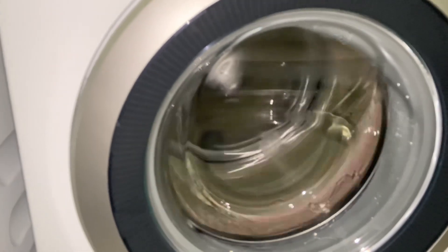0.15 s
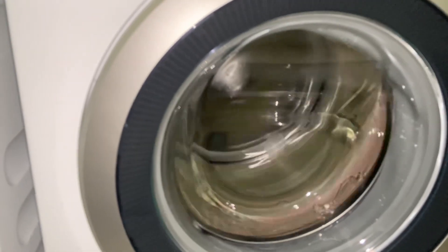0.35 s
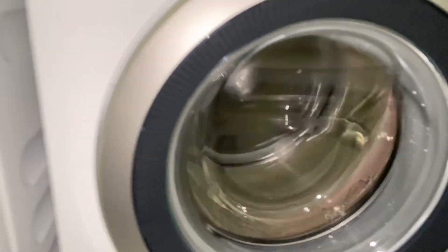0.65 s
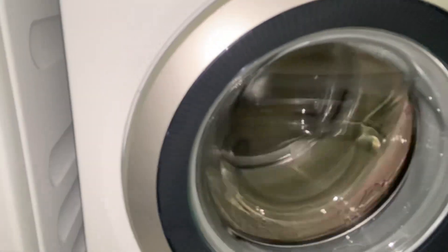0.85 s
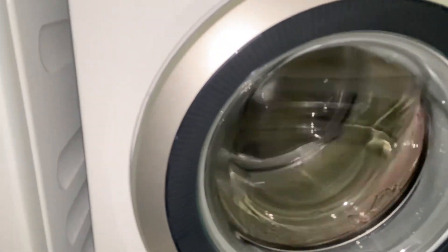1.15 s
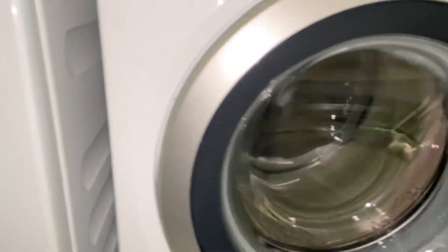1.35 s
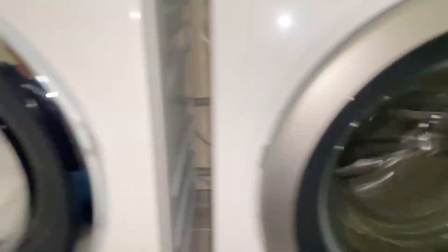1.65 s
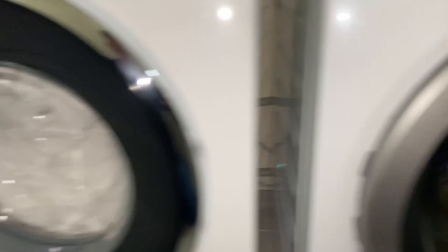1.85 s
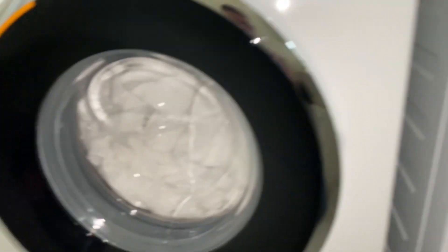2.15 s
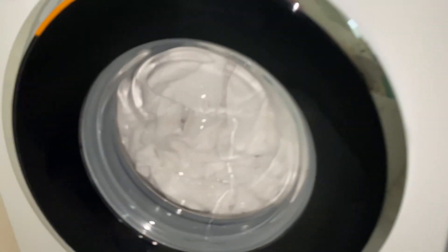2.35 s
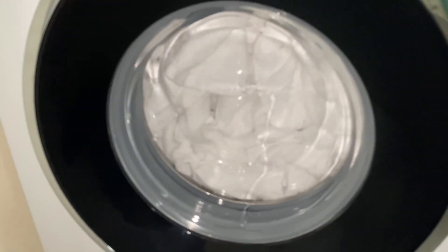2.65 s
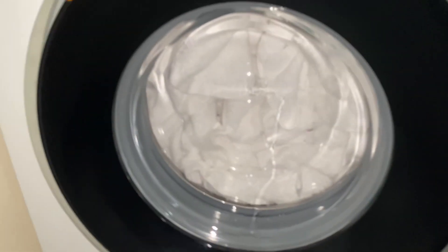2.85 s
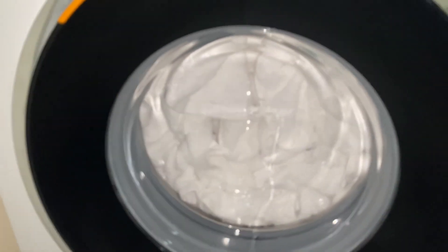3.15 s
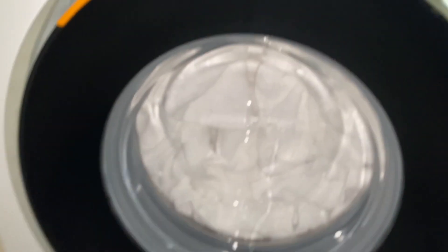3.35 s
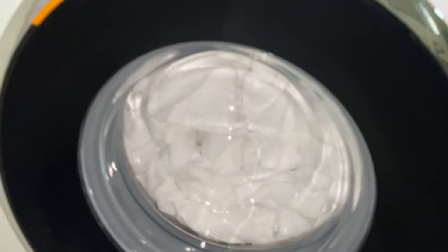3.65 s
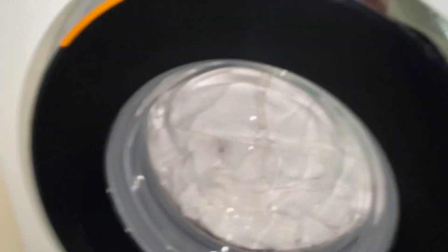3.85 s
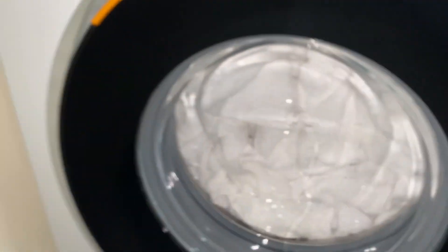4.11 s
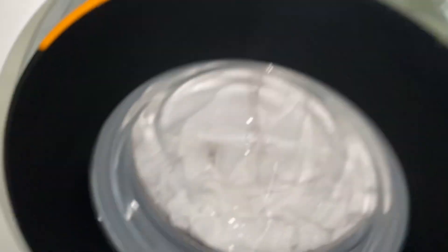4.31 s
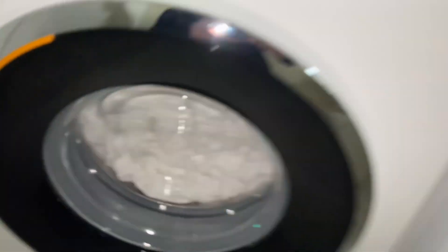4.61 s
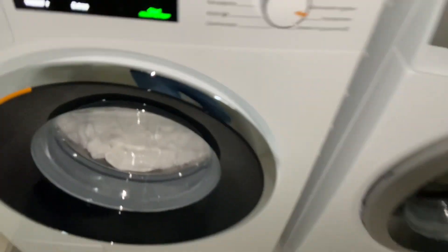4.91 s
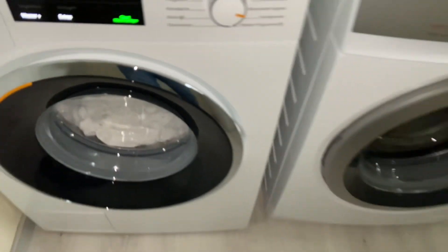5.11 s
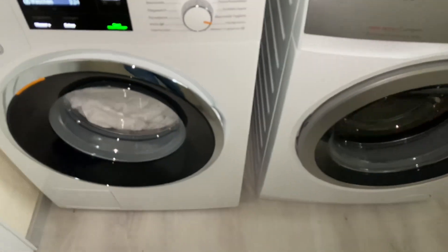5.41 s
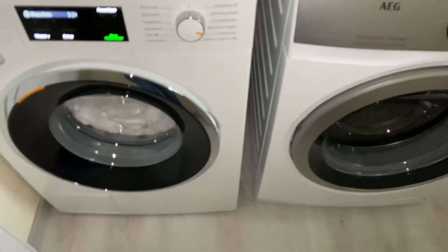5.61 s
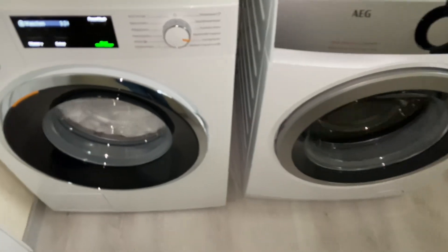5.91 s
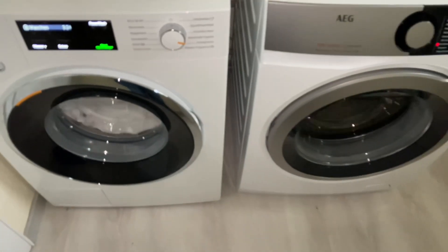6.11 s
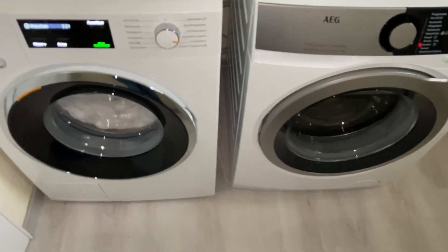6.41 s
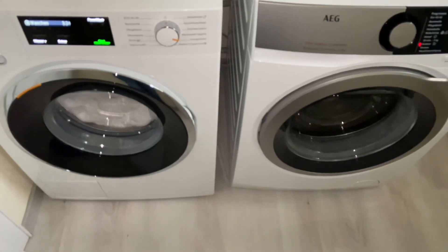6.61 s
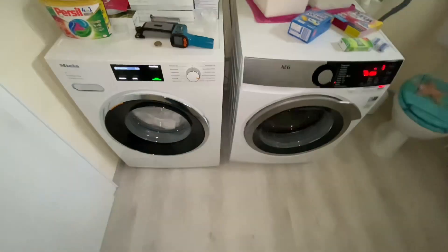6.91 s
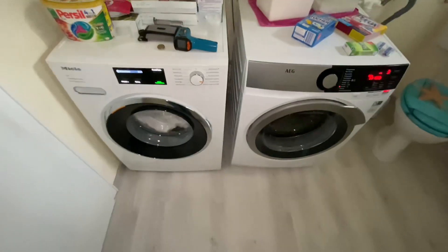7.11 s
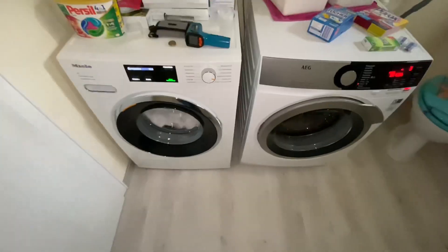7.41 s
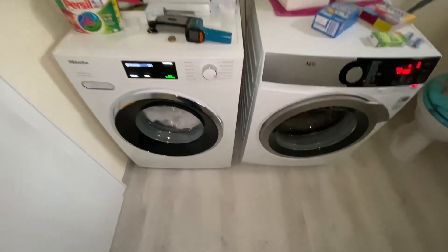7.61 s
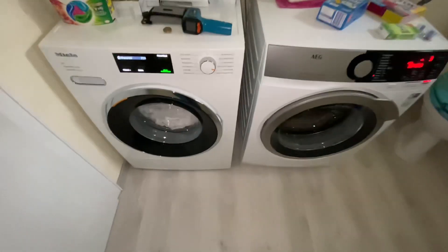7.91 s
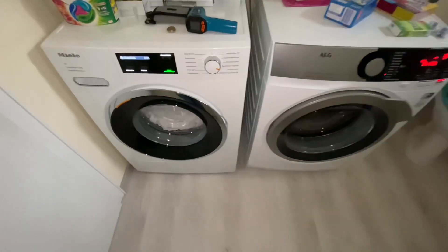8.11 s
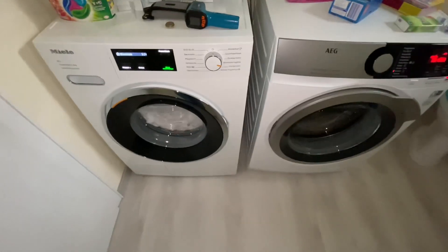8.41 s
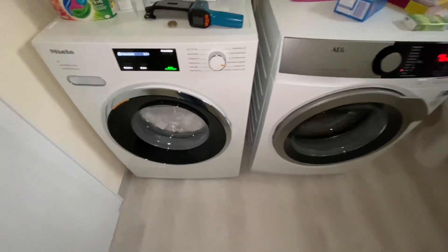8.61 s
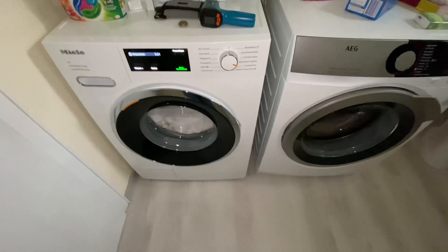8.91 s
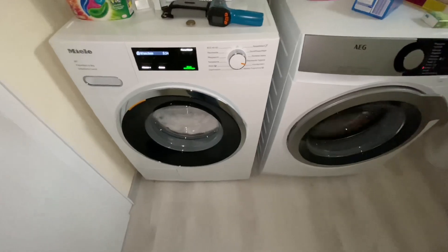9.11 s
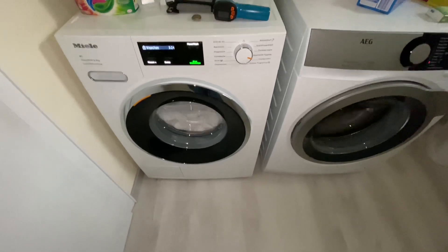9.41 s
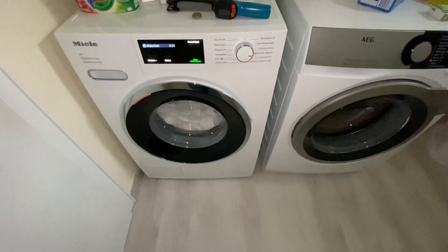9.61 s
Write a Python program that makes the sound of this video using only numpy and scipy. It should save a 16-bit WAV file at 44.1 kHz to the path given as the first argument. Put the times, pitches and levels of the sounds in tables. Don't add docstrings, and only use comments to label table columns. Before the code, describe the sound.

Steady spin-cycle roar with low throbbing hum and wavering thin whine; an early handling knock, later a brighter, airier sound from farther back.

```python
import sys
import numpy as np
from scipy import signal
from scipy.fft import rfft, irfft
from scipy.io import wavfile
from scipy.ndimage import map_coordinates

SR = 44100
rng = np.random.default_rng(int(sys.argv[2]) if len(sys.argv) > 2 else 0)


def store_wav(level_fs):
    pcm = np.round(np.clip(np.atleast_2d(level_fs), -1, 1) * 32767)
    wavfile.write(sys.argv[1], SR, pcm.T.astype(np.int16))


def volts(x):
    e = np.asarray(x, float) / 20
    return 10 ** e


N = 429975

DRUM_HZ, MOTOR_HZ = 20.168, 211.655
# time in seconds, level in dB of the panel singing on the 32nd
PANEL = [(0, -51, -42, -57), (1.4, -55, -53, -45), (1.8, -58, -43.5, -47), (2.2, -59, -41, -50),
         (2.7, -57, -58, -56), (3.4, -44, -65, -53), (4.2, -46, -55, -45), (4.6, -47, -51, -37),
         (5, -45, -57, -40), (5.4, -38, -46, -44), (5.8, -42, -55, -45), (6.4, -50, -42, -52),
         (7, -41.5, -45, -61), (7.8, -38, -42.5, -45), (8.3, -38.5, -38.5, -44), (9, -42, -45.5, -43.5),
         (9.4, -42.5, -55, -39), (9.75, -40, -56, -43)]
# start in seconds, peak in dB, ring in Hz.
KNOCKS = [(0.345, -20.5, 563), (0.793, -24, 600), (2.265, -27, 650), (3.606, -27, 554), (4.17, -23, 736),
          (4.716, -24, 705), (5.111, -25, 743), (6.529, -26, 743), (6.875, -21, 713), (6.998, -19, 642),
          (7.838, -19, 644), (8.332, -17, 650), (8.433, -20, 637), (8.53, -23, 635), (8.628, -19, 640),
          (8.729, -25, 606), (9.129, -21, 651)]


def in_time(rows):
    s, *columns = np.transpose(rows)
    return [np.interp(np.arange(N) / SR, s, c) for c in columns]


def by_place(at_first, at_second, at_back):
    # time in seconds, share at the first door (0-1), share at the second door (0-1).
    place = [
        (0, 1, 0),
        (1.75, 1, 0),
        (2.0, 0, 1),
        (4.4, 0, 1),
        (4.85, 0, 0),
        (9.75, 0, 0),
    ]
    first, second = in_time(place)
    return first * at_first + second * at_second + (1 - first - second) * at_back


def in_gap():
    return np.interp(np.arange(N) / SR, (1.7, 1.95, 2.35, 2.6), [0, 1, 1, 0])


def drift(rate):
    r = np.exp(-200 * np.pi * rate / SR)
    slow = signal.lfilter([1], [1, -2 * r, r * r], rng.standard_normal(N // 100 + 2002))[2000:]
    return np.interp(np.arange(N) / 100, np.arange(len(slow)), slow / slow.std())


def band_pass(x, low_hz, high_hz):
    return signal.sosfilt(signal.butter(2, [low_hz, high_hz], "band", fs=SR, output="sos"), x)


def tone(hz, level_db, across_db, wobble, fade_db, start=None):
    start = rng.random() if start is None else start
    turn = 2 * np.pi * (hz * np.arange(N) / SR + start) + wobble * drift(3.4)
    gap = np.pi + min(hz / 330, 3) * rng.normal() + (.6 + hz / 1500) * drift(.6)
    common = volts(level_db + fade_db * drift(4.2)) * np.sin(turn)
    across = volts(across_db + fade_db * drift(1.7)) * np.sin(turn + gap)
    return np.sqrt(2) * np.array([common + across, common - across])


def partials(table, base_hz, wobble, fade_db):
    far = np.interp(np.arange(N) / SR, (6.6, 7.0), [0, 1])
    gap_db = -4.5 * in_gap()
    out = np.zeros((2, N))
    for multiple, first, second, back, far_back, across in table:
        hz = multiple * base_hz
        level_db = by_place(first, second, back + far * (far_back - back))
        if 400 < hz < 800:
            level_db = level_db + gap_db
        out += tone(hz, level_db, across, wobble * max(1, hz / 600), fade_db)
    return out


def drum():
    # multiple of the drum turn, level in dB at first door,
    # second door, first step back, far back, and in dB across the ports.
    drum_lines = [(1, -69, -68, -65, -64, -86), (2, -52, -49, -54, -53, -66), (4, -58, -59, -54, -61, -66),
                  (6, -49, -43, -42, -42, -49), (7, -44, -52, -49, -50, -52), (8, -48, -57, -44, -46, -55),
                  (9, -44, -43, -50, -56, -52), (11, -51, -45, -62, -51, -52), (12, -46, -58, -49, -52, -53),
                  (13, -51, -52, -54, -54, -59), (14, -63, -48, -60, -56, -65),
                  (15, -48, -38, -53, -47, -48), (16, -52, -53, -52, -50, -58), (17, -45, -42, -49, -45, -53),
             (18, -44, -55, -58, -48, -50), (19, -52, -55, -49, -49, -58), (20, -55, -69, -48, -57, -63),
             (21, -55, -53, -47, -53, -54), (22, -49, -63, -55, -52, -53), (23, -58, -54, -56, -65, -62),
             (24, -70, -70, -54, -67, -61), (25, -70, -57, -55, -60, -62),
                  (26, -55, -51, -69, -68, -57), (27, -46, -55, -49, -45.5, -56), (28, -67, -66, -70, -70, -63),
            (29, -48, -52, -64, -61, -52), (30, -52, -48, -48, -50, -50), (31, -52, -57, -55, -59, -61),
            (33, -59, -68, -52, -65, -59), (34, -54, -54, -51, -51, -55), (35, -51, -58, -49, -51, -49),
            (36, -66, -56, -55, -63, -51), (37, -49, -47, -52, -57, -49), (38, -52, -69, -64, -59, -58),
            (39, -53, -56, -48, -57, -54), (40, -57, -58, -69, -61, -64), (41, -71, -63, -64, -63, -65)]
    return partials(drum_lines, DRUM_HZ, wobble=0.12, fade_db=1.9)


def motor_turn():
    # multiple of the motor turn, level in dB at first door, second door, first step back, far back,
    # and in dB across the ports.
    motor = [(4, -61, -58, -72, -58, -56), (8, -63, -63, -66, -68, -64), (10, -68, -69, -73, -66, -66),
             (16, -75, -71, -73, -73, -66)]
    return partials(motor, MOTOR_HZ, wobble=0.22, fade_db=5.0)


def belt_and_bearings():
    # frequency in Hz, level in dB at first door, second door, first step back, far back,
    # and in dB across the ports.
    lines = [(66.9, -45, -49, -51, -52, -62), (162.7, -55, -63, -48, -53, -58),
             (171.3, -53, -58, -54, -55, -63), (191.6, -49, -49, -54, -51, -58),
             (203.8, -52, -62, -56, -58, -68), (291.3, -52, -53, -54, -49, -56),
             (327.8, -67, -57, -52, -49, -61), (553.6, -46, -56, -51, -54, -55),
             (713.8, -67, -57, -55, -61, -54), (740.5, -59, -57, -52, -56, -59),
             (757.4, -67, -58, -67, -60, -58), (772.0, -69, -54, -53, -56, -59),
             (830.4, -70, -63, -48, -53, -51), (845.0, -64, -52, -57, -61, -54),
             (1648.9, -65, -66, -66, -67, -62), (1878.9, -67, -73, -74, -67, -66)]
    return partials(lines, 1, wobble=0.26, fade_db=3.0)


def turn_pattern(level_db, low_hz, high_hz):
    length = 2048
    sparse = volts(5 * rng.exponential(1, length // 2 + 1).clip(0, 3))
    patterns = irfft(rfft(rng.standard_normal((2, 31, length))) * sparse)
    turn = (DRUM_HZ * np.arange(N) / SR % 1) * length
    slowly = np.linspace(0, 30, N)
    heard = np.array([map_coordinates(p, [slowly, turn], order=1, mode="grid-wrap") for p in patterns])
    heard = band_pass(heard, low_hz, high_hz)
    return volts(level_db) * heard / heard.std()


def boom():
    # time in seconds, level in dB.
    level = [(0, -33), (1.9, -33.5), (2.3, -32.5), (4.68, -31.5), (4.78, -39), (4.95, -38), (5.3, -46),
             (5.8, -59), (6.6, -57), (8.07, -43), (9.75, -39)]
    level_db = in_time(level)[0]
    return tone(3 * DRUM_HZ, level_db, level_db - 14, wobble=.05, fade_db=-1.0)


def pump_throb():
    # level in dB at first door, at second door, standing back.
    levels_db = [
        (-40, -36.5, -52),
        (-40.5, -40, -45.5),
        (-48, -47, -46.5),
        (-41, -39, -52.5),
    ]
    t = np.arange(N) / SR
    slip = 1.452 * (t - 0.16)
    above = .845 * (t - 0.87)
    turns = 99.963 * t + np.array([0 * slip, -slip, -2 * slip, above])
    hum = np.zeros(N)
    for levels, turn in zip(levels_db, turns):
        gain = volts(by_place(*levels) + .6 * drift(1.7))
        hum += gain * np.sin(2 * np.pi * turn + .1 * drift(2.2))
    return np.sqrt(2) * hum * (1 + volts(-14.5) * np.array([[-1], [1]]))


def motor_hum():
    # time in seconds, level in dB.
    hum = [(0, -33.5), (1.4, -32.5), (2.2, -32), (2.6, -37.5), (3.4, -36.5), (3.8, -34.5), (4.6, -36),
           (5.8, -39), (6.3, -43), (8, -40.5), (9.75, -45)]
    tenth_hz, tenth_db = 10 * DRUM_HZ, in_time(PANEL)[2]
    crest_s = .054
    out = tone(MOTOR_HZ, in_time(hum)[0], -41.0, wobble=0.1, fade_db=0.6, start=0)
    start = (MOTOR_HZ - tenth_hz) * crest_s
    return out + tone(tenth_hz, tenth_db, -58, wobble=.08, fade_db=.6, start=start)


def singing_panel():
    panel_db, bearing_db, _ = in_time(PANEL)
    panel_hz = 32 * DRUM_HZ
    above_hz, crest_s = 8.62, .073
    out = tone(panel_hz, panel_db, -45, wobble=.1, fade_db=.6, start=0)
    out += tone(panel_hz + above_hz, bearing_db - 1.5, -52, wobble=.1, fade_db=.6, start=-above_hz * crest_s)
    out += tone(32.497 * DRUM_HZ, bearing_db - 7, -56, wobble=.1, fade_db=1, start=-.34)
    motor_db = panel_db - 10 + by_place(9, 1, -1)
    return out + tone(3 * MOTOR_HZ, motor_db, -55, wobble=.1, fade_db=1.5, start=0)


def crests():
    # middle in seconds, length in seconds, peak in dB.
    swells = [(.28, 1, -54), (0.873, 0.51, -53), (1.25, .25, -52), (1.43, 0.3, -44), (1.72, 0.17, -48.5),
              (1.862, .12, -57), (1.976, 0.11, -49), (2.1, 0.11, -55), (2.25, 0.19, -45.5),
              (2.4, 0.18, -46), (2.56, 0.18, -51), (2.726, 0.22, -49), (2.96, 0.21, -52.5),
              (3.17, 0.24, -61), (3.33, 0.43, -54.5), (3.616, 0.52, -53.5), (3.93, .3, -63),
              (4.21, .26, -58), (4.394, 0.079, -46), (4.474, 0.077, -46.5), (4.603, 0.17, -53.5),
              (4.79, 0.22, -66), (4.97, 0.2, -47.5), (5.085, 0.076, -45), (5.158, .075, -51),
              (5.434, 0.26, -50), (5.75, 0.19, -53.5), (5.95, .3, -63), (6.208, 0.24, -52),
              (6.48, 0.3, -61), (6.93, 0.55, -49.5), (7.267, 0.47, -44), (7.546, 0.15, -42.5),
              (7.725, 0.3, -39), (8.176, 0.3, -49.5), (8.388, 0.15, -49), (8.57, 0.36, -54.5),
              (8.89, .25, -51), (9.062, 0.24, -46.5), (9.3, 0.31, -49.5), (9.5, 0.34, -44.5),
              (9.7, .22, -47.5)]
    t = np.arange(N) / SR
    gain = volts(-64.5) * np.ones(N)
    for middle, length, db in swells:
        gain += volts(db) * np.cos(np.pi * np.clip((t - middle) / length, -.5, .5)).clip(0) ** 0.96
    return 20 * np.log10(gain)


def beads():
    # start in seconds, end in seconds, beads per second, a crest in seconds, depth (0-1).
    runs = [
        (-.2, .85, 20.8, .465, .6),
        (-.2, 1.2, 13.5, .97, .45),
        (3.4, 4.1, 19.5, 3.575, .7),
    ]
    t = np.arange(N) / SR
    swing = 1
    for start, end, rate, crest, depth in runs:
        present = np.interp(t, [start, start + .1, end - .1, end], [0, 1, 1, 0])
        swing = swing + depth * present * np.exp(2j * np.pi * rate * (t - crest))
    return 20 * np.log10(np.abs(swing) + .03)


def whine():
    slots_hz, level_db = 24 * MOTOR_HZ, crests()
    out = tone(slots_hz, level_db + beads(), -51 + 2.4 * drift(3.7), wobble=0.55, fade_db=1.13)
    side_lines = ((-DRUM_HZ, -65), (DRUM_HZ - 5, -64), (2 * DRUM_HZ, -72), (100, -73), (-100, -74))   # Hz, dB
    for offset_hz, side_db in side_lines:
        line_db = side_db + .35 * (level_db + 61.5) + by_place(-2, -1.5, -0.45)
        out += tone(slots_hz + offset_hz, line_db, side_db - 1.5, wobble=1.0, fade_db=3.5)
    return out


def whistles():
    # start in seconds, end in
    # seconds, frequency in Hz, width in Hz, level in dB.
    whistle_rows = [(0, 1, 1650, 14, -55), (1.6, 2.6, 1650, 14, -60), (2.5, 3.2, 2250, 60, -59),
                    (7.8, 9.2, 2520, 30, -61), (1, 1.5, 1810, 20, -59), (4.4, 5.5, 1650, 22, -58),
                    (4.5, 5.2, 1697, 12, -58), (5.2, 6.45, 1813, 8, -56), (6.8, 7.4, 1890, 25, -57),
                    (8, 8.55, 1650, 6, -55), (8.25, 9.05, 1696, 10, -59), (4.4, 5.2, 2250, 60, -57),
                    (7.55, 7.9, 3387, 6, -61), (3.8, 4.4, 3387, 5, -60.5), (6.15, 7.3, 3387, 5, -63),
                    (4.6, 5.4, 2500, 25, -62), (6.2, 7, 2490, 15, -62), (8.62, 9.3, 3387, 5, -62),
                    (4.1, 4.7, 2130, 20, -59), (7, 7.5, 2900, 15, -62), (8.5, 9.7, 2960, 25, -63),
                    (6.05, 7.2, 1650, 6, -59), (9.2, 9.75, 1800, 40, -56), (2.5, 4.7, 745, 20, -47),
                    (4.3, 5.5, 800, 120, -45), (0, 1.7, 550, 14, -47), (1.2, 2, 440, 16, -48),
                    (1.5, 1.9, 705, 16, -44), (4.4, 4.9, 840, 16, -48), (5.4, 6, 295, 25, -43),
                    (8.7, 9.1, 680, 80, -41), (5.9, 6.7, 162, 10, -43), (4.5, 5.1, 440, 12, -44),
                    (6.5, 7.2, 700, 40, -44),
                    (5.08, 5.45, 3387, 5, -60.5), (5.75, 6, 3387, 5, -63), (9.42, 9.75, 3387, 5, -63),
              (6.5, 8, 301, 4, -43), (6.5, 7.1, 363, 5, -45), (6.5, 7.4, 706, 14, -46),
              (8.5, 9, 706, 5, -46), (4, 5.2, 706, 5, -47), (3.6, 4.6, 746, 5, -45), (0, .55, 553, 6, -45),
              (6.5, 7, 464, 5, -48), (6.6, 8, 787, 5, -51), (2, 2.5, 830, 5, -51), (1.9, 3.4, 342, 5, -45),
              (9.3, 9.75, 600, 30, -45), (5.05, 5.6, 291, 12, -47), (2.2, 3.3, 845, 5, -52),
              (8.08, 8.3, 3387, 5, -64), (9.3, 9.6, 700, 30, -46)]
    out = np.zeros((2, N))
    for start, end, hz, width, level_db in whistle_rows:
        span = slice(round(start * SR), round(end * SR))
        peak = signal.iirpeak(hz, hz / width, SR)
        narrow = signal.lfilter(*peak, rng.standard_normal((2, N // 4)))
        narrow = signal.lfilter(*peak, narrow)[:, :span.stop - span.start]
        if width < 7:
            narrow = narrow / (np.abs(signal.hilbert(narrow)) + .3 * narrow.std())
        narrow = narrow[0] + 0.061 * narrow[1] * [[1], [-1]]
        swell = signal.windows.tukey(narrow.shape[1], .3)
        out[:, span] += volts(level_db) * narrow / narrow.std() * swell
    return out


def roar_levels():
    # level in dB at first door, at second door, standing back.
    layers_db = [
        (0.5, -2, -2),
        (-0.5, -1.5, -1.2),
        (3, 1.5, -0.5),
        (0.2, 1.5, 1.5),
        (-0.5, 0, -0.5),
        (-2.5, -1.5, -2.5),
    ]
    puff_db = (-0.5, 0, -2, 1.5, 3, 4.5)
    brighter_db = (-2, 1.25, 1, 0.9, 3.5, 2)
    t = np.arange(N) / SR
    puff = np.interp(t - 3.75, [0, .05, .21, .29], [0, 1, 1, 0])
    brighter = np.interp(t - 6.79, [-.04, .04], [0, 1])
    return [by_place(*row) + puff * a + brighter * b for row, a, b in zip(layers_db, puff_db, brighter_db)]


def roar():
    # frequency in Hz, level in dB per Hz.
    mid_colour = [(30, -13), (50, -11), (75, 4.5), (130, -4), (260, -2), (330, -3), (760, -6), (1000, -13),
                  (1400, -21.5), (2200, -23), (4700, -31.5), (7200, -32.5), (11000, -36.5), (15500, -41.5)]
    side_colour = [(30, -36), (70, -3), (204, -20), (260, -7), (732, -4), (1060, -12), (1700, -17),
                   (2600, -25), (4700, -29.5), (7200, -31.5), (9000, -29), (13000, -41), (15500, -33)]
    levels, out = roar_levels(), np.zeros((2, N))
    edges = 25 * 2 ** np.arange(0, 9.6, 1 / 3)
    white = rng.standard_normal((2, 2, N))
    for k, (low, high) in enumerate(zip(edges, edges[1:])):
        band = band_pass(white[k % 2], low, high)
        hz = np.sqrt(low * high)
        colour = []
        for table in (mid_colour, side_colour):
            table_hz, table_db = np.transpose(table)
            colour.append(np.interp(np.log(hz), np.log(table_hz), table_db))
        layer = levels[np.searchsorted([400, 900, 1600, 4000, 9000], hz)]
        patches = volts(layer + .9 * drift(7) + .6 * drift(.8))
        out += band * volts(np.add(colour, [-15.5, -18.5]))[:, None] * patches
    return np.array([out[0] + out[1], out[0] - out[1]]) * volts([[-.9], [.9]])


def hushed(x):
    t = np.arange(N) / SR
    dips = sum(np.interp(t - s, (-.013, -.006, .003, .012), [0, 1, 1, 0]) for s, db, hz in KNOCKS)
    panels = signal.sosfiltfilt(signal.butter(2, [450, 1100], "band", fs=SR, output="sos"), x)
    return x - .6 * np.clip(dips, 0, 1) * panels


def knocks():
    rise_s, t60_s = .0015, .06
    out, t = np.zeros(N), np.arange(SR // 10) / SR
    for s, db, hz in KNOCKS:
        at = round(s * SR)
        ring = volts(db - 60 * t / t60_s) * np.sin(2 * np.pi * hz * t)
        out[at:at + len(t)] += (1 - np.exp(-t / rise_s)) * ring
    return out * volts([[-.8], [.8]])


def bump():
    # start in seconds, push in dB, push in Hz, direction (+-1), rattle in dB.
    contacts = [(.411, -17, 90, 1, -50), (.4195, -15, 90, -1, -47), (.4265, -18, 55, 1, -43),
                (.4333, -10.5, 220, -1, -34), (.435, -30, 300, -1, -37), (.4435, -18, 120, 1, -38),
                (.449, -11, 230, 1, -39), (.452, -17, 80, -1, -41), (.4585, -25, 90, 1, -42),
                (.4708, -14, 170, -1, -37), (.4785, -12, 190, 1, -36.5), (.487, -14, 90, -1, -45),
                (.4925, -23, 150, 1, -44), (.4965, -11, 140, 1, -44), (.5, -20, 55, -1, -45),
                (.508, -25, 120, 1, -46), (.513, -19, 180, -1, -48), (.521, -20, 220, 1, -50),
                (.5335, -18, 240, 1, -46), (.537, -17, 130, -1, -48), (.546, -19, 150, 1, -48),
                (.551, -19, 250, -1, -50), (3.06, -38, 32, 1, -70), (3.42, -38, 35, -1, -70),
                (4.70, -32, 42, 1, -70)]
    # frequency in Hz, width in Hz, level in dB.
    case = [(1750, 500, -3), (2300, 400, 0), (3000, 350, 3), (4500, 1800, -14), (1100, 700, 0),
            (390, 110, 15)]
    out, shaken, t = np.zeros(N), np.zeros(N), np.arange(SR // 5) / SR
    for s, push_db, push_hz, way, rattle_db in contacts:
        tick_hz = max(3000 + 220 * (rattle_db + 34), 1800)
        at = round(s * SR)
        span = slice(at, at + len(t))
        out[span] += np.sign(way) * volts(push_db + 4 - 17 * t * push_hz) * np.sin(2 * np.pi * push_hz * t)
        shaken[span] += volts(rattle_db - 6 - 4900 * t) + volts(rattle_db - 10 - 420 * t)
        out[span] += volts(rattle_db - 2200 * t) * np.sin(2 * np.pi * tick_hz * t)
    common, across = shaken * rng.standard_normal((2, N)) + 1e-18
    noise = common + volts(1.0) * across * [[1], [-1]]
    out = out * volts([[-1.2], [1.2]])
    for hz, width, level_db in case:
        out += volts(level_db) * signal.lfilter(*signal.iirpeak(hz, hz / width, SR), noise)
    return band_pass(out, 28, 5500)


def scene():
    lines = volts(0.5) * (drum() + motor_turn() + belt_and_bearings())
    lines += turn_pattern(-50, 850, 1300) + turn_pattern(-54, 1600, 2700)
    hums = boom() + pump_throb() + motor_hum() + singing_panel()
    room = hushed(lines + hums + whine() + whistles() + roar()) + knocks()
    lean_left_db = by_place(0.53, 0.1, 0.18)
    return room * volts(lean_left_db * np.array([[1], [-1]])) + bump()


def silence_bands(x, bands):
    hz, s, frames = signal.stft(x, SR, nperseg=2048)
    keep = np.ones(frames.shape)
    slices = np.kron(rng.random((len(hz) // 8 + 1, len(s) // 2 + 1)), np.ones((8, 2)))
    slices = slices[:len(hz), :len(s)]
    for low, high, start, end, share in bands:
        whole = np.repeat(rng.random(len(s)), 2)[:len(s)]
        chance = .4 * whole + .6 * slices
        inside = np.outer((hz >= low) & (hz < high), (s >= start) & (s <= end + .03))
        keep[(chance < share) & inside] = 0
    return signal.istft(frames * keep, SR, nperseg=2048)[1][:N]


def low_pass(x):
    return signal.sosfilt(signal.butter(12, 16740, fs=SR, output="sos"), x)


def record(dry):
    # low edge in Hz, high edge in Hz, start in
    # seconds, end in seconds, share of frames (0-1).
    empty_mid = [(8270, 8600, 0, 6.78, .8), (8600, 9640, 0, 6.78, 1), (11900, 12400, 6.8, 9.75, .3),
                 (12400, 13780, 0, 9.75, 1), (13780, 14300, 0, 9.75, .35), (13780, 15100, 6.8, 9.75, .45),
                 (15100, 16000, 6.8, 9.75, .8), (15720, 22050, 0, 9.75, 1)]
    empty_side = [(6400, 6890, 0, 6.78, .12), (6890, 7580, 0, 6.78, .5), (10340, 11710, 0, 6.82, 1),
                  (10500, 11200, 6.8, 9.75, .55), (11200, 11710, 6.8, 9.75, 1),
                  (11710, 12400, 6.8, 9.75, .6), (12400, 14470, 6.8, 9.75, .15),
                  (13780, 14470, 0, 9.75, .25), (14470, 22050, 0, 9.75, 1)]
    mid = silence_bands((dry[0] + dry[1]) / 2, empty_mid)
    side = silence_bands((dry[0] - dry[1]) / 2, empty_side)
    return low_pass(np.array([mid + side, mid - side]))


dry = scene()
out = record(dry)
store_wav(out)
```